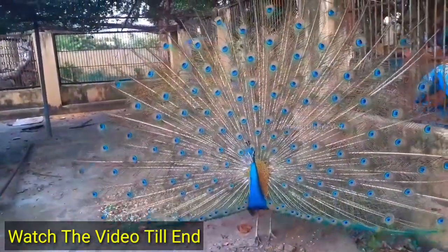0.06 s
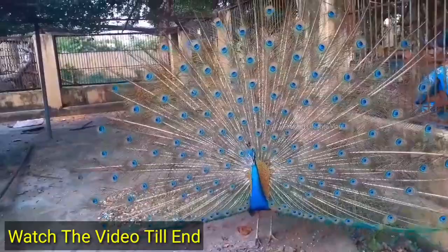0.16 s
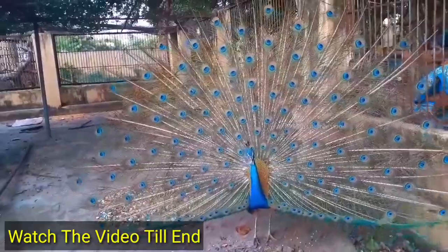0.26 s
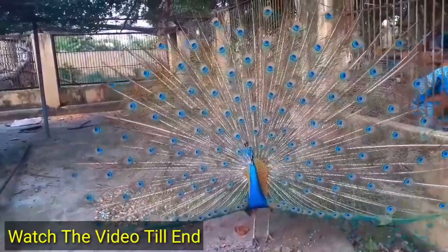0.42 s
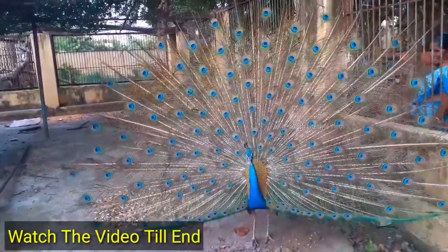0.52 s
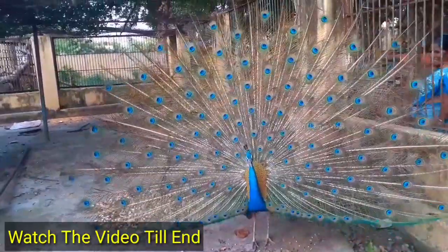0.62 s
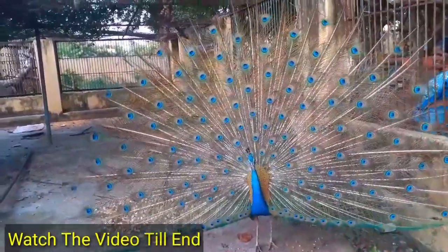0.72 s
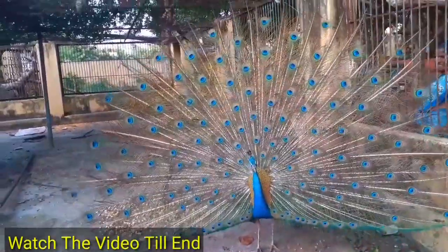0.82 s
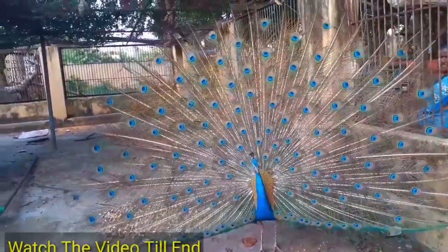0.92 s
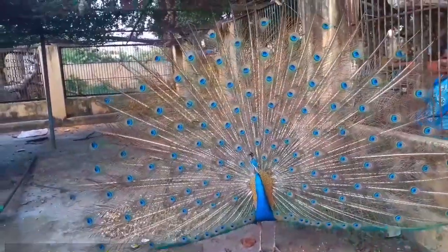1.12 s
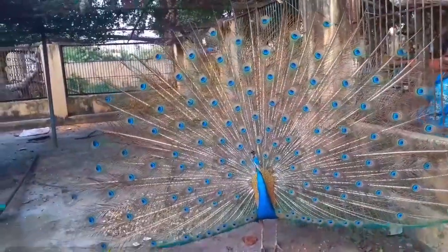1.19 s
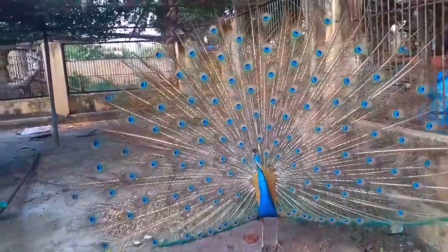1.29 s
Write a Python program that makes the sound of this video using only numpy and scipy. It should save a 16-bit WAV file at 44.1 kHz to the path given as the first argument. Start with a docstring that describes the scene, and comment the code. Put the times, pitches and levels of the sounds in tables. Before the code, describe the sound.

A peacock gives one loud cry from about 0.2 to 0.8 seconds, rising in pitch until 0.5 and then falling. The call is bright with a hissy edge, a few metres away, and slightly overloads the microphone. The yard walls ring briefly after it. Very faint outdoor air and a low hum lie underneath, and a distant cricket chirps softly from about 1.0 to 1.3 seconds.

```python
"""One loud, arching peacock cry in a walled yard, a few metres from a phone that overloads.
The bird's syrinx glides up and back down, a clean harmonic voice sounding through the resonances
of windpipe and beak. A high hiss lies over the cry, pulsing with its pitch. The walls ring briefly.
Far behind lie outdoor air, a low hum, a cricket and two faint tones; a small tick with a short
ping comes just before the cry."""
import sys
import numpy as np
from scipy import signal
from scipy.fft import rfft, irfft, next_fast_len
from scipy.io import wavfile
from scipy.ndimage import uniform_filter1d, minimum_filter1d

SR = 44100
rng = np.random.default_rng(int(sys.argv[2]) if len(sys.argv) > 2 else 0)


def to_wav(sig):
    """Store sig (one row per channel, or 1-D mono) as 16-bit WAV at the path in sys.argv[1].

    Samples outside -1..1 are clipped; the rate is SR.
    """
    pcm = np.clip(np.atleast_2d(sig), -1, 1) * 32767
    pcm = np.round(pcm).astype(np.int16)
    wavfile.write(sys.argv[1], SR, pcm.T)  # frames by channels


N = 59535


def undb(db):
    """Decibels to amplitude."""
    return 10 ** (np.asarray(db) / 20)


def level(x, db):
    """Scale to an rms level."""
    return x * undb(db) / np.sqrt(np.mean(x ** 2))


def walk(rate_hz):
    """Random levels held 1 / rate s and smoothed twice; spread near 1."""
    hold = int(SR / rate_hz)
    steps = np.repeat(rng.standard_normal(N // 40), hold)[:N]
    return 1.3 * uniform_filter1d(uniform_filter1d(steps, hold), hold)


def band(x, hz, width):
    """Resonant band-pass."""
    return signal.lfilter(*signal.iirpeak(hz, hz / width, fs=SR), x)


def peacock_cry(t):
    """Fluttering harmonics of the syrinx, brighter with effort; over them a high hiss pulses at the pitch."""
    # course of the cry: t/s, f/Hz, level/dB, treble lift/dB, hiss/dB
    cry = [(0.186, 544.8, -8, -54, -2.5), (0.199, 555.6, -10, -14.5, -15.5), (0.22, 575, -8.5, -6, 2.5),
           (0.244, 598.3, -10.5, -2.5, 0.5), (0.28, 631, -6, -7, 5), (0.321, 646.1, -9, 6, -27.5),
           (0.37, 659.1, -7.5, 5, -15), (0.428, 664.8, -7.5, 4, 4.5), (0.49, 668, -4.6, -2, 0),
           (0.551, 663.8, -7, 1, -20.5), (0.602, 656.1, -9.5, 6, -19.5), (0.641, 644.2, -4.5, -3.5, -6.5),
           (0.678, 616, -8, -2.9, -5), (0.72, 589, -9, 0.4, -14), (0.759, 561.9, -9.5, -8.5, -37.5),
           (0.79, 540.2, -8, -14, -48), (0.811, 505, -16, -20.5, -7), (0.826, 473, -29, -29, 2)]
    times, hz, db, treble_db, hiss_db = np.array(cry).T
    attack_s, release_s = .0048, .0029
    jitter, flutter_db, treble_hz, hiss_hz = .0008, 2.53, 5090, 7800
    blur_rad, blur_from_hz, blur_full_hz = .79, 4700, 11000

    def glide(column):
        return uniform_filter1d(np.interp(t, times, column), size=900)

    pitch = glide(hz) * (1 + jitter * walk(rate_hz=150))
    phase = 2 * np.pi * np.cumsum(pitch) / SR
    voice = 0
    for k in range(1, 33):
        blur_share = np.clip((k * pitch - blur_from_hz) / (blur_full_hz - blur_from_hz), 0, 1)
        blur = blur_rad * blur_share * walk(rate_hz=240)  # phase noise smears the high harmonics
        lift = glide(treble_db) * np.clip(k * pitch / treble_hz, 0, 1) ** 2
        flutter = flutter_db * walk(rate_hz=40.54)
        voice = voice + undb(lift + flutter) * np.cos(k * phase + blur)
    wide_noise = rng.standard_normal(N) + 2.25 * rng.standard_normal((2, N))
    high_noise = signal.sosfilt(signal.butter(5, hiss_hz, "high", fs=SR, output="sos"), wide_noise)
    hiss = undb(glide(hiss_db)) * (1 + .9 * np.cos(phase)) * high_noise
    onset = np.clip((t - times[0]) / attack_s + 1, 0, 1)
    ending = np.clip((times[-1] - t) / release_s + 1, 0, 1)
    return (voice + hiss) * undb(np.interp(t, times, db)) * (onset * ending) ** 2


def windpipe_and_beak(voice):
    """Resonances of windpipe and beak, each with its own strength and phase at the two microphones."""
    # resonances: f/Hz, width/Hz, left level/dB, right level/dB, left phase lead/rad
    # the last three colour the cry's falling end
    resonances = [(590, 68, -14.5, -15.5, 0.28), (1214, 110, -24, -7, 3), (1217, 226, -8.5, -13.5, 6),
                  (1684, 97, -11.5, -9.5, -1.5), (1964, 117, -0.5, 1, -0.33), (2471, 143, 0.5, -0.5, 2.38),
                  (3012, 72.3, 3, 0.3, 0.43), (3372, 240, -18.5, -7.0, -2), (3837.5, 133, -4, -6, -1.26),
                  (4330, 260, -9.5, -7, 1.35), (4762, 106, -4.5, -5.5, 1.02),
                  (5260, 600, -10.5, -14.5, 1.57), (6100, 120, -34, -14.5, -5),
                  (6733, 250, -16, -16.5, 0.64), (7272, 86, -36.5, -15, -3), (7493, 97, -14.5, -17.5, 1.5),
                  (8580, 270, -16, -18, -1.8), (9244.0, 380, -15.5, -17.5, 4),
                  (9945, 390, -15.7, -44, -3.5), (10500, 110, -21, -16, -0.5),
                  (11170, 476, -20, -25.5, 1.24), (12305, 480, -16, -16, 1.86),
                  (13169.0, 472.0, -37, -49, 1.2), (13740, 2500, -25, -24.5, 1.76),
                  (960, 76, -13, -2, 4.16), (2188, 150, -8.5, -8.5, 2.37), (2696, 57, -13.5, -5, -2)]
    size = next_fast_len(N + SR // 10)
    f = np.arange(size // 2 + 1) * SR / size + 1e-6
    response = 0
    for k, (hz, width, left_db, right_db, lead) in enumerate(resonances):
        detuning = (f / hz - hz / f) * hz / width / np.sqrt(2)
        peak = (-1) ** k / (1 + 1j * detuning) ** 2
        at_mics = np.array([[undb(left_db) * np.exp(.5j * lead)], [undb(right_db) * np.exp(-.5j * lead)]])
        response = response + peak * at_mics
    return irfft(rfft(voice, size) * response, size)[:, :N]


def yard(bird):
    """Dense early echoes off fence and ground, then a weak longer tail that loses its treble first."""
    slap_t60_s, low_t60_s, high_t60_s = .2, .62, .53
    slap_top_hz, split_hz, tail_top_hz = 5900, 4500, 9000
    lag = np.arange(SR // 2) / SR
    noise = rng.standard_normal((3, 2, len(lag)))
    early = signal.lfilter(*signal.butter(1, slap_top_hz, fs=SR), noise[0])
    low = signal.lfilter(*signal.butter(1, split_hz, fs=SR), noise[1])
    high = signal.lfilter(*signal.butter(1, [split_hz, tail_top_hz], "band", fs=SR), noise[2])
    slap = early * undb(-60 * lag / slap_t60_s)
    tail = low * undb(-60 * lag / low_t60_s) + high * undb(-60 * lag / high_t60_s)
    echoes = (level(slap, db=-13) + level(tail, db=-21.5)) / np.sqrt(len(lag))
    return signal.fftconvolve(bird, echoes, axes=1)[:, :N]


def air():
    """Distant outdoor noise in bands that each flicker; the bass is nearly alike at both microphones."""
    # spectrum of the open air: f/Hz, relative level/dB
    spectrum = [(25, -22), (55, -9.5), (85, -9.5), (130, -12), (300, -19.5), (560, -21), (800, -29.5),
                (2000, -29.5), (4000, -32.5), (7000, -43), (11000, -46.5), (15000, -47)]
    spectrum_hz, spectrum_db = np.array(spectrum).T
    full_width_hz = 700
    out = 0
    for hz in 30 * 2 ** np.arange(0, 9.1, 1 / 3):  # third octaves
        mid, side = (band(rng.standard_normal(N), hz, hz / 4) for _ in range(2))
        db = np.interp(np.log(hz), np.log(spectrum_hz), spectrum_db) + .5 * walk(rate_hz=2.7)
        spread = min(hz / full_width_hz, 1) * np.array([[1], [-1]])
        out = out + undb(db) * (mid + spread * side)
    return level(out, db=-50)


def hum():
    """A low hum that wavers: a narrow band of noise."""
    hz, width_hz = 84, 20
    rumble = band(rng.standard_normal(N), hz, width_hz)
    return level(band(rumble, hz, width_hz), db=-50.5)


def cricket(t):
    """A far cricket: one high, wavering tone in short chirps before and after the cry."""
    # chirps: start t/s, length/s, level/dB
    chirps = [(.01, 0.15, -65), (0.152, 0.019, -59.5), (1.023, .035, -59.5), (1.058, .1, -57),
              (1.166, 0.058, -56.5), (1.235, 0.1, -63.5)]
    pitch_hz, waver_db, edge_s = 3910, 1.5, .006
    waver = undb(waver_db * walk(rate_hz=60.2))
    pitch = pitch_hz * (1 + .00184 * walk(rate_hz=22))
    envelope = 0
    for start, length, db in chirps:
        ramp = np.minimum(t - start, start + length - t) / edge_s
        envelope = envelope + undb(db) * np.clip(ramp, 0, 1)
    return envelope * waver * np.sin(2 * np.pi * np.cumsum(pitch) / SR)


def tones_and_ping(t):
    """Two faint distant tones, and the 3 ms ping of the tick."""
    # tone, ping, tone: start t/s, length/s, f/Hz, level/dB
    tones = [(-0.02, 0.087, 1970, -58.5), (.143, 0.0033, 3590, -47.5), (1.282, 0.11, 964, -56)]
    out = 0
    for start, length, hz, db in tones:
        envelope = np.sin(np.pi * np.clip((t - start) / length, 0, 1))
        out = out + undb(db) * envelope * np.sin(2 * np.pi * hz * t)
    return out


def tick(t):
    """One faint dry tick just before the cry: bright noise that dies at once."""
    start_s, decay_s = .143, .004
    envelope = (t > start_s) * np.exp(-np.abs(t - start_s) / decay_s)
    return undb(-48) * envelope * band(rng.standard_normal(N), hz=5000, width=5000)


def scene():
    """At the microphones: the bird a few metres off, the yard's echoes and the quiet background."""
    t = np.arange(N) / SR
    bird = windpipe_and_beak(peacock_cry(t))
    return bird + yard(bird) + air() + hum() + cricket(t) + tones_and_ping(t) + tick(t)


def record(dry):
    """The phone: a fast limiter reins in the cry, peaks still over full scale clip, and the top is cut."""
    gain_db, limit, hold_s = 3, 1.63, .0013
    knee, top_hz = 19.5, 15500
    x = dry * undb(gain_db)
    hold = int(hold_s * SR)
    peak = np.abs(x).max(axis=0) + 1e-9
    held_gain = minimum_filter1d(np.minimum(1, limit / peak), 2 * hold)
    limited = x * uniform_filter1d(held_gain, hold)
    clipped = limited / (1 + np.abs(limited) ** knee) ** (1 / knee)
    low_pass = signal.ellip(8, .2, 60, top_hz, fs=SR, output="sos")
    return np.clip(signal.sosfilt(low_pass, clipped), -1, 1)


dry = scene()
out = record(dry)
to_wav(out)
```